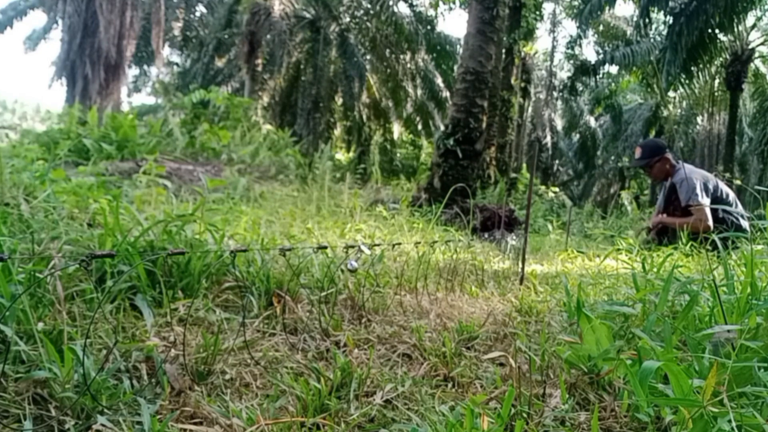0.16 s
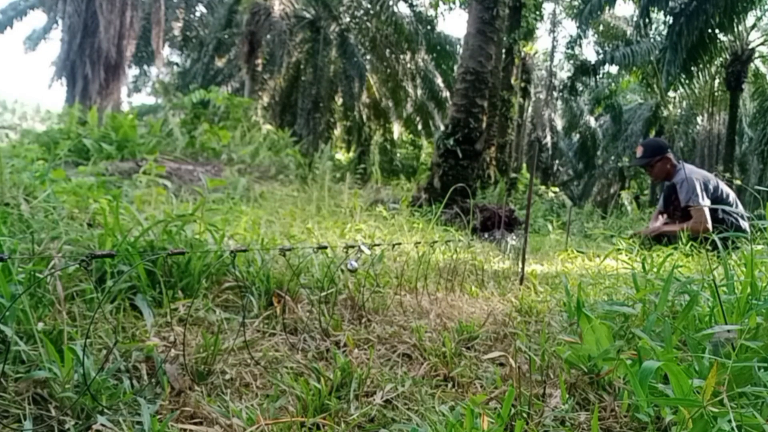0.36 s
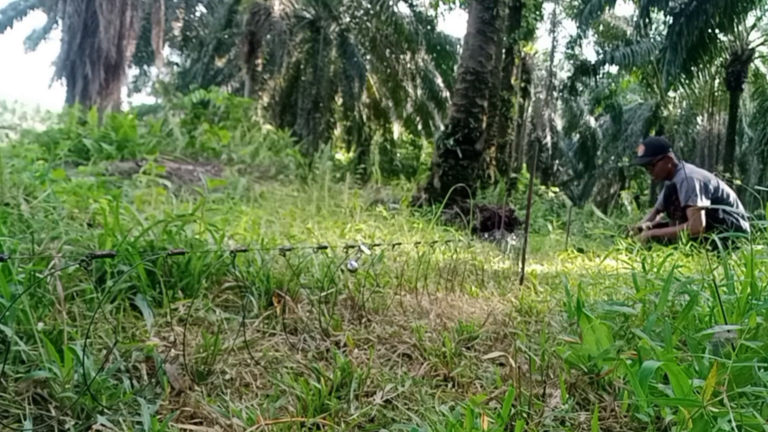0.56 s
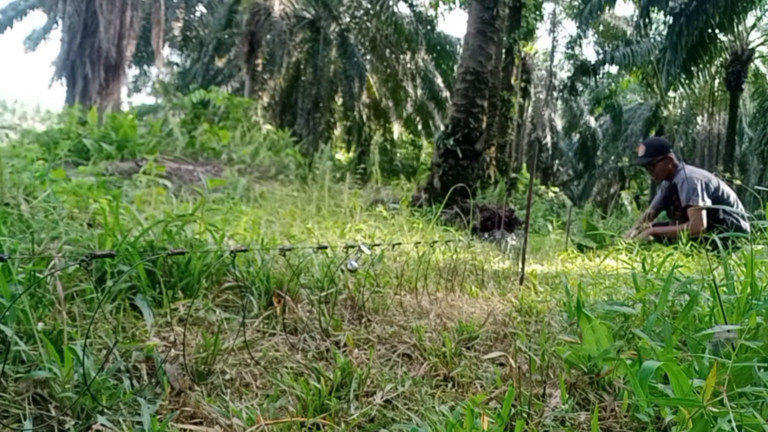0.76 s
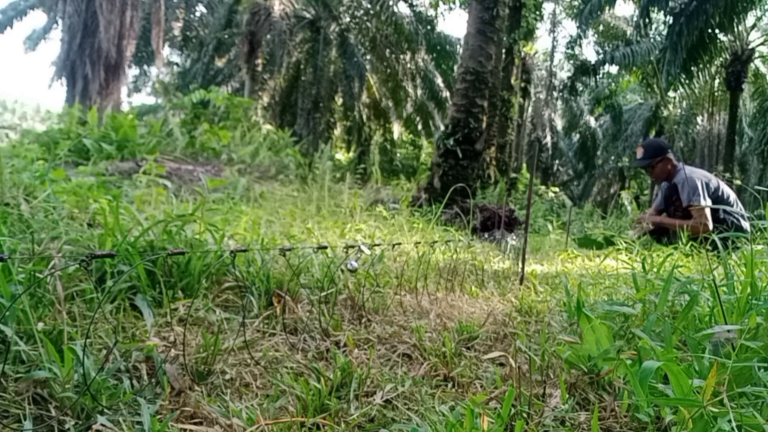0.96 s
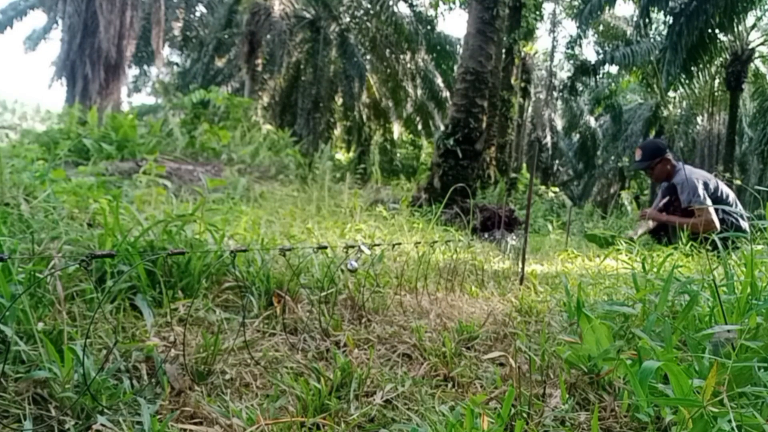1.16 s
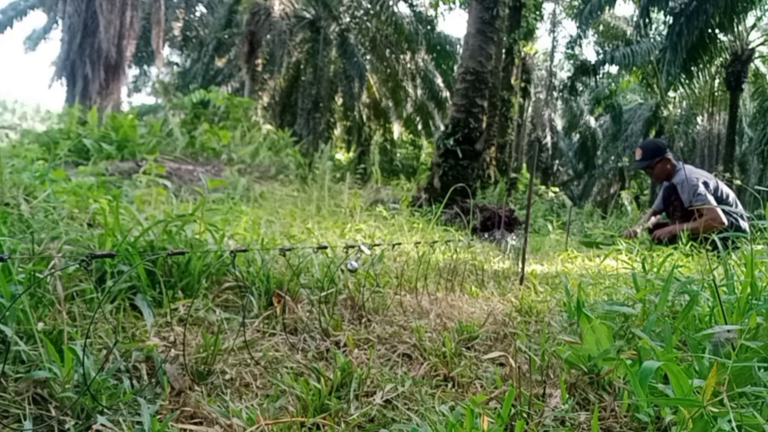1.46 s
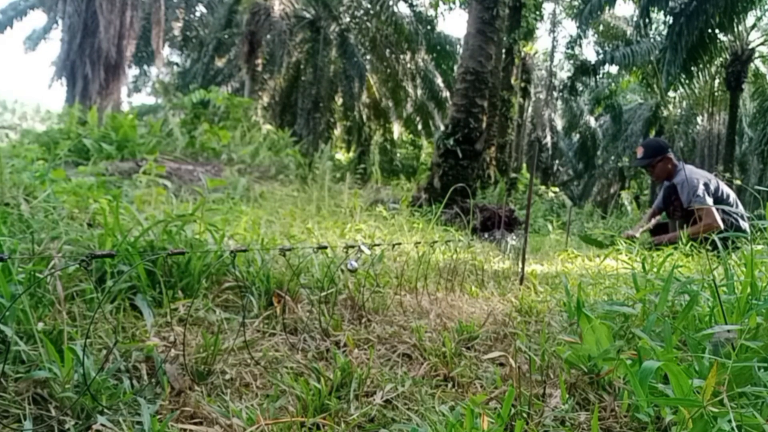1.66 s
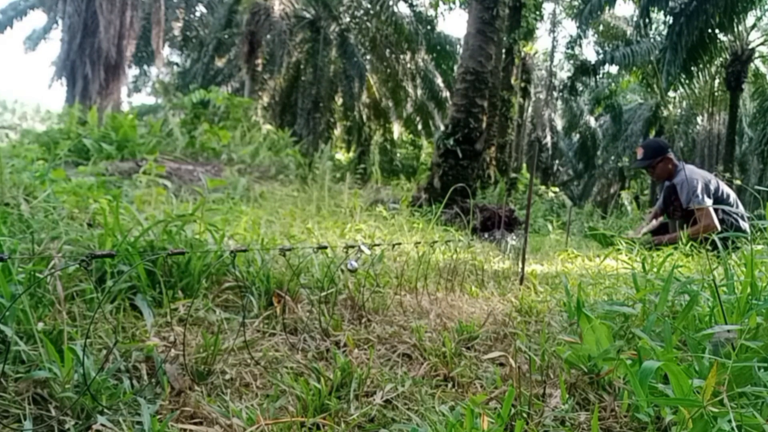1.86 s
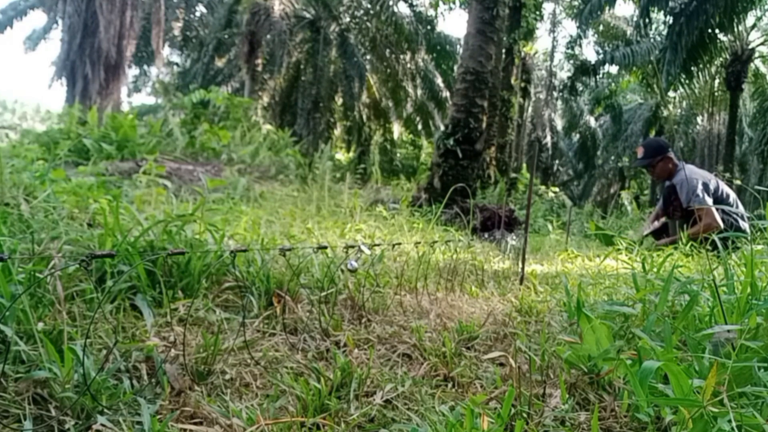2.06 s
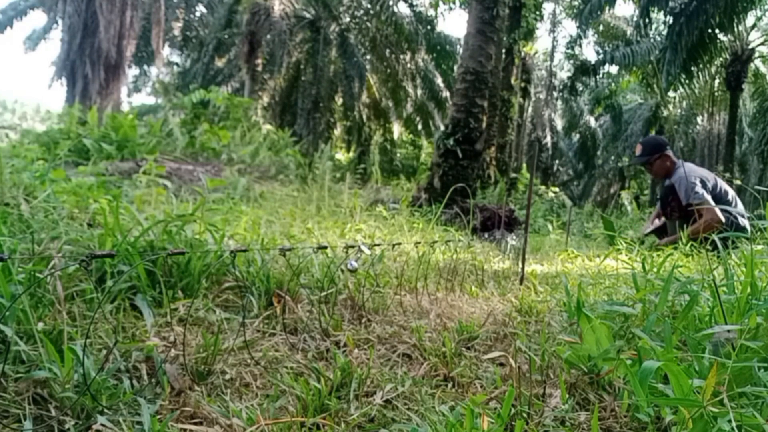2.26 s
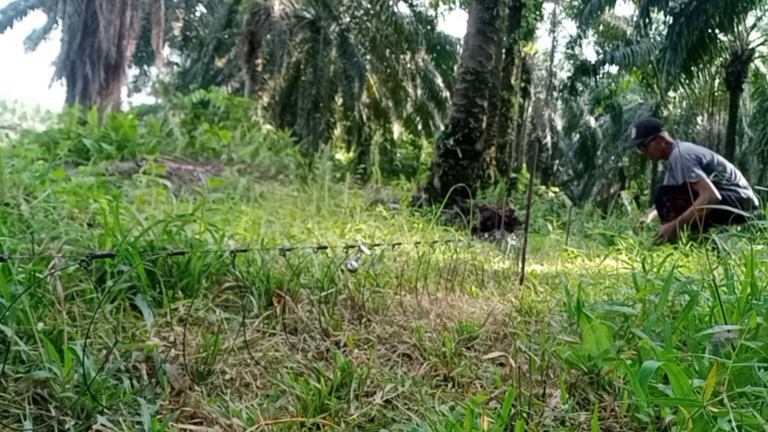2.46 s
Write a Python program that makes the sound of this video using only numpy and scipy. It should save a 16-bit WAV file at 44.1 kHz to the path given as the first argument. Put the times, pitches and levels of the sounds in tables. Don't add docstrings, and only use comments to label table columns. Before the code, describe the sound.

A waterhen calls five times, each a quick low whistle breaking upward, echoing off trunks in an open plantation; a near cricket chirps rapidly, distant cicadas drone, and dry leaves rustle softly near the microphone.

```python
import sys
import numpy as np
from scipy import signal
from scipy.fft import rfft, irfft, next_fast_len
from scipy.io import wavfile
from scipy.ndimage import uniform_filter1d, map_coordinates

SR = 44100
rng = np.random.default_rng(int(sys.argv[2]) if len(sys.argv) > 2 else 0)


def transcribe(signal):
    frames = np.atleast_2d(signal).T
    limited = np.clip(frames, -1, 1)
    pcm = np.round(limited * 32767).astype(np.int16)
    wavfile.write(sys.argv[1], SR, pcm)


def ratio(d):
    e = np.asarray(d, float) / 20
    return 10 ** e


N = 114660


def unit(x):
    return x / np.sqrt(np.mean(x ** 2) + 1e-20)


def along(points, hz):
    f, value = np.transpose(points)
    return np.interp(np.log(hz + 1), np.log(f + 1), value)


def wobble(rate, size=N):
    knots = rng.standard_normal(size // 100 + 8)
    return map_coordinates(knots, [np.arange(size) * rate / SR], mode="wrap")


def coloured(x, points):
    m = next_fast_len(len(x) + 8192)
    gain = ratio(along(points, np.fft.rfftfreq(m, 1 / SR)))
    return irfft(rfft(x, m) * gain, m)[:len(x)]


def rush(spectrum, patchy_db, bins=4, frames=6):
    z = signal.stft(rng.standard_normal(N + 512), nperseg=512)[2]
    field = uniform_filter1d(rng.standard_normal(z.shape), size=bins, axis=0)
    field = uniform_filter1d(field, size=frames, axis=1)
    noise = signal.istft(z * ratio(patchy_db * unit(field)), nperseg=512)[1][:N]
    return unit(coloured(noise, spectrum))


def bump(t, centre, rise, fade):
    width = np.where(t < centre, rise, fade)
    return np.exp(-.5 * ((t - centre) / width) ** 2)


# f/Hz, level/dB per Hz
AIR_SPECTRUM = [(150, -34), (250, -9.5), (1080, -14.5), (1170, -9.5), (1340, -12.5), (3050, -17),
                (4200, -15), (5460, -40.5), (9240, -120)]


def open_air():
    return ratio(-82 + 0.37 * wobble(3.7)) * rush(AIR_SPECTRUM, patchy_db=1.5)


# f/Hz, level/dB
WIND_SPECTRUM = [(15, -57.5), (25, -26), (32, -26.5), (70, 0), (249, -6), (300, -12.5), (390, -42.5),
                 (660, -120)]


def wind():
    gusts_db = 1.2 * wobble(6) + 2 * wobble(25)
    return ratio(-84.5 + gusts_db) * rush(WIND_SPECTRUM, patchy_db=2.5)


# f/Hz, level/dB
CICADA_BAND = [(3590, -51), (6100, -29), (6200, -20), (6480, -10.5), (6690, 1.5), (7180, 4.5), (7920, -4.5),
               (9480, -29), (10100, -30.5), (13100, -65.5), (22000, -120)]
BUZZ_BAND = [(12000, -40.5), (12800, -16.5), (13500, -4), (14200, 0.5), (14800, 6), (15500, -11)]
FAR_CRICKET_BAND = [(3900, -50.5), (4250, -15), (4640, -1.5), (5140, -13), (5650, 8), (6160, -12.5),
                    (6500, -15.5), (7000, -65.5)]
KATYDID_BAND = [(9000, -45), (10000, -22.5), (10600, -1), (10900, 5), (12000, -6), (12600, -11.5),
                (13500, -5.5), (15500, -11)]
# t/s, level/dB
BUZZ_LEVEL = [(0.0, -68), (0.18, -62.5), (0.3, -68.5), (0.78, -66), (0.82, -72.5), (0.93, -64.5),
              (1.03, -73.5), (1.05, -68.5), (1.09, -70), (1.14, -58.5), (1.15, -67), (1.43, -64),
              (1.45, -69.5), (1.67, -64), (1.92, -69), (2.19, -62), (2.25, -68), (2.6, -65)]


def insect_drone():
    cicadas = ratio(-51.5 + .4 * wobble(1) + 0.55 * wobble(140)) * rush(CICADA_BAND, patchy_db=0.97)
    buzz_db = 1.5 + np.interp(np.arange(N) / SR, *np.transpose(BUZZ_LEVEL))
    buzz_db += 1.9 * wobble(22) + 1.2 * wobble(97)
    buzz = ratio(buzz_db) * rush(BUZZ_BAND, patchy_db=1.9)
    far_crickets = ratio(-64.5 + 0.55 * wobble(6)) * rush(FAR_CRICKET_BAND, patchy_db=1.94)
    katydids = ratio(-71.5) * rush(KATYDID_BAND, patchy_db=1.3)
    return cicadas + buzz + far_crickets + katydids


CHIRP_ONSETS = [.006, .119, .252, .403, .553, .686, .83, .987, 1.105, 1.252, 1.41, 1.545, 1.677, 1.822,
                1.958, 2.104, 2.248, 2.393, 2.524]
STROKE_COUNTS = [4, 6, 6, 6, 4, 6, 6, 3, 7, 6, 5, 4, 4, 6, 7, 6, 6, 4, 5]
STROKE_PERIOD_S, STROKE_WIDTH_S = .0115, 0.0025
WING_HZ, WING_SPREAD_HZ, SWEEP_HZ_PER_S = 5500, 10, -50000
CRICKET_DB, GRASS_ECHO_DB, GRASS_T60_S = -48.5, -8, .13


def cricket():
    lead_s = .01
    out = np.zeros(N + SR)
    t = np.arange(SR // 8) / SR - lead_s
    for start, count in zip(CHIRP_ONSETS, STROKE_COUNTS):
        timing, strength, tuning, phase = rng.standard_normal((count, 4)).T
        stroke = np.arange(count)
        at = stroke * STROKE_PERIOD_S + 0.00027 * timing
        size = ratio(CRICKET_DB + 2.2 * strength - 4.5 * (stroke == 0))
        u = t - at[:, None]
        hz = WING_HZ + WING_SPREAD_HZ * tuning
        cycles = hz[:, None] * u + SWEEP_HZ_PER_S * u ** 2 / 2 + phase[:, None]
        strokes = size[:, None] * bump(u, 0, STROKE_WIDTH_S, STROKE_WIDTH_S) * np.sin(2 * np.pi * cycles)
        out[round(start * SR):][:len(t)] += strokes.sum(axis=0)
    direct = out[round(lead_s * SR):][:N]
    echo_t = np.arange(SR // 4) / SR
    tail = rng.standard_normal(len(echo_t)) * ratio(-60 * echo_t / GRASS_T60_S)
    echo = signal.fftconvolve(direct, tail / np.linalg.norm(tail))[:N]
    return direct + ratio(GRASS_ECHO_DB) * echo


# f/Hz, level/dB
TRUNK_RESPONSE = [(600, -38.5), (860, -32), (1120, -20.5), (1230, -25.5), (1700, -24), (3300, 8),
                  (3520, 13.5), (3750, 4)]
ECHO_START_S, ECHO_HOLD_S, ECHO_LUMPS_DB = .006, .14, 2.2
ECHO_SAG_DB_PER_S, ECHO_FALL_DB_PER_S = 110, 220


def trunk_echoes(x):
    t = np.arange(SR // 2) / SR
    decay_db = -ECHO_SAG_DB_PER_S * t - ECHO_FALL_DB_PER_S * np.maximum(t - ECHO_HOLD_S, 0)
    decay = ratio(decay_db + ECHO_LUMPS_DB * wobble(75, size=len(t)))
    decay = decay * np.clip(t / ECHO_START_S - 1, 0, 1)
    scatter = coloured(rng.standard_normal(len(t)), TRUNK_RESPONSE)
    return signal.fftconvolve(x, scatter * decay / np.linalg.norm(decay))


# t/s, low note length/s, high note length/s, level/dB, overtone level/dB
CALLS = [
    (0.217, 0.048, 0.049, -1, -2.5),
    (.721, 0.049, 0.048, -1, 0.5),
    (1.224, 0.05, 0.05, 0, -0.5),
    (1.729, 0.051, 0.052, -0.45, -0.5),
    (2.226, 0.05, 0.049, -0.5, 3.5),
]
# t/s, f/Hz
CALL_PITCH = [(0, 885), (.008, 864), (.03, 839), (.037, 880), (.044, 950), (.049, 1030), (.06, 1170),
              (.068, 1245), (.08, 1220)]
# t/s, level/dB
CALL_LEVEL = [(0, -64.5), (.006, -38.5), (.042, -38), (.048, -54), (.059, -31), (.078, -28.5),
              (.088, -30.5), (.097, -40.5), (.103, -68.5)]
# f/Hz, level/dB per Hz
BREATH_SPECTRUM = [(120, -38), (210, -8), (280, 3), (350, -12), (450, -2), (600, -11), (1000, -16.5),
                   (1700, -41)]
BREAK_S, END_S = .048, .103


def waterhen():
    out, size = np.zeros(N + SR), SR // 6
    for start, low_s, high_s, db, bright_db in CALLS:
        t = np.interp(np.arange(size) / SR, [0, low_s, low_s + high_s, 1], [0, BREAK_S, END_S, 1])
        hz = uniform_filter1d(np.interp(t, *np.transpose(CALL_PITCH)), size=90)
        hz = hz * (1 + .003 * wobble(82, size=size))
        level_db = np.interp(t, *np.transpose(CALL_LEVEL), right=-140)
        level_db = uniform_filter1d(level_db, size=60) + .35 * wobble(110.3, size=size)
        phase = 2 * np.pi * np.cumsum(hz) / SR
        whistle = ratio(level_db) * np.sin(phase)
        third_partial = ratio(-53.5 + bright_db) * bump(t, 0.0665, .002, 0.0069) * np.sin(3 * phase)
        subharmonics = ratio(-42.5) * np.sin(phase / 2) + ratio(-61.5) * np.sin(1.5 * phase)
        doubling = bump(t, BREAK_S, .003, 0.0062) * subharmonics
        breath = unit(coloured(rng.standard_normal(size), BREATH_SPECTRUM))
        breath = ratio(-62) * bump(t, 0.038, 0.026, 0.026) * breath
        voice = ratio(db) * (np.sqrt(2) * (whistle + third_partial + doubling) + breath)
        voice *= np.clip(t / .003, 0, 1)
        echoes = trunk_echoes(voice)
        first = round(start * SR)
        out[first:][:size] += voice
        out[first:][:len(echoes)] += echoes
    return out[:N]


# t/s, rise/s, fade/s, level/dB
LEAF_SWELLS = [
    (.552, 0.0086, 0.033, -74),
    (0.598, 0.026, 0.068, -67),
    (0.759, 0.021, .03, -60.5),
    (0.882, .03, 0.044, -66),
]
# f/Hz, level/dB per Hz
LEAF_SPECTRUM = [(350, -19.5), (600, -3.5), (1000, -4.5), (1550, 1), (1850, -22), (2500, -13), (4000, -15),
                 (13000, -21.5)]


def leaf_rustle():
    t = np.arange(N) / SR
    swell = sum(ratio(db) * bump(t, s, rise, fade) for s, rise, fade, db in LEAF_SWELLS)
    return swell * ratio(2.5 * wobble(70)) * rush(LEAF_SPECTRUM, patchy_db=5.0, bins=1, frames=7)


# t/s, level/dB
LEAF_SNAPS = [
    (.556, -68),
    (.61, -69.5),
    (.765, -64.5),
    (.868, -70),
    (2.112, -67.5),
]
# f/Hz, level/dB per Hz
SNAP_SPECTRUM = [(3000, -30), (8000, -6.5), (10000, -2.5), (12800, 2.5), (15500, -6.5)]


def leaf_crackle():
    t, fade_s = np.arange(N) / SR, .006
    snaps = sum(ratio(db) * bump(t, s, fade_s / 2, fade_s) for s, db in LEAF_SNAPS)
    return snaps * rush(SNAP_SPECTRUM, patchy_db=-1.5)


# t/s, f/Hz, level/dB
PEEPS = [
    (1.351, 2310, -77.5),
    (1.37, 2578, -83),
    (2.364, 2350, -84.5),
]


def faint_peeps():
    t, width_s, rough_db = np.arange(N) / SR, .02, 5
    out = np.zeros(N)
    for s, hz, db in PEEPS:
        envelope = ratio(db + rough_db * wobble(80)) * bump(t, s, width_s, width_s)
        out += envelope * np.sin(2 * np.pi * hz * t)
    return out


# f/Hz, level/dB per Hz
TWIG_SPECTRUM = [(900, -33), (1200, -19.5), (1450, -3), (1700, -25.5), (2500, -16), (3000, -17),
                 (3450, -13.5), (4200, -36.5)]


def twig_snap():
    start_s, level_db, t60_s = 2.111, -67.5, .16
    t = np.arange(N) / SR
    decay = ratio(level_db - 60 * np.abs(t - start_s) / t60_s) * (t > start_s)
    return decay * rush(TWIG_SPECTRUM, patchy_db=2.0, bins=1, frames=9)


def scene():
    weather = open_air() + wind()
    animals = waterhen() + cricket() + insect_drone()
    litter = twig_snap() + leaf_rustle() + leaf_crackle()
    return (weather + animals + litter + faint_peeps())[None]


def low_pass(x):
    return signal.sosfilt(signal.butter(12, 16570, fs=SR, output="sos"), x)


def record(dry):
    passed = np.fft.rfftfreq(N, 1 / SR) < 15500
    mix = irfft(rfft(dry) * passed, N)
    return low_pass(mix)


dry = scene()
out = record(dry)
transcribe(out)
```